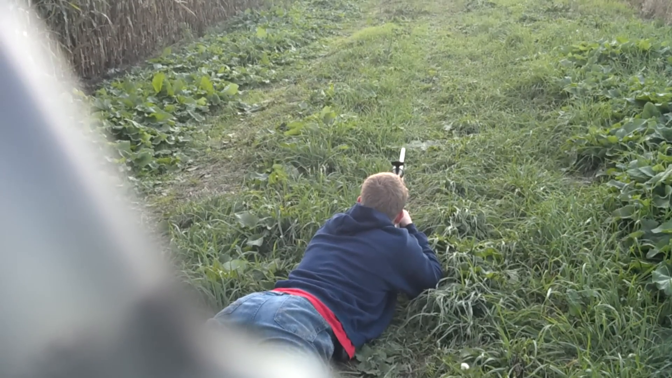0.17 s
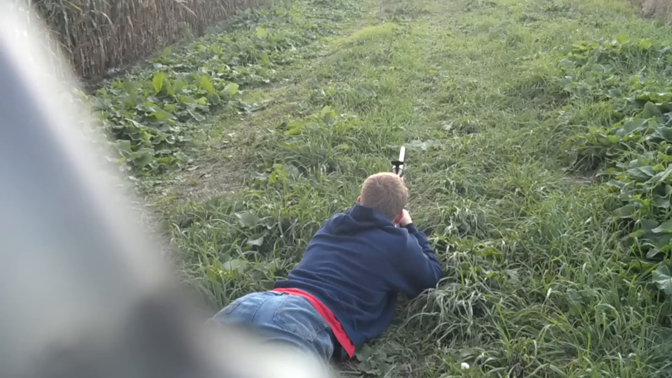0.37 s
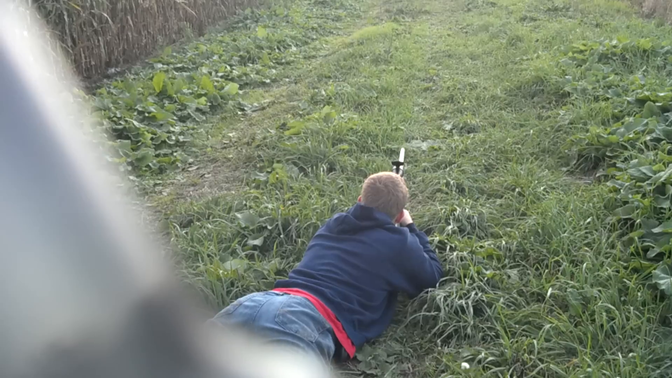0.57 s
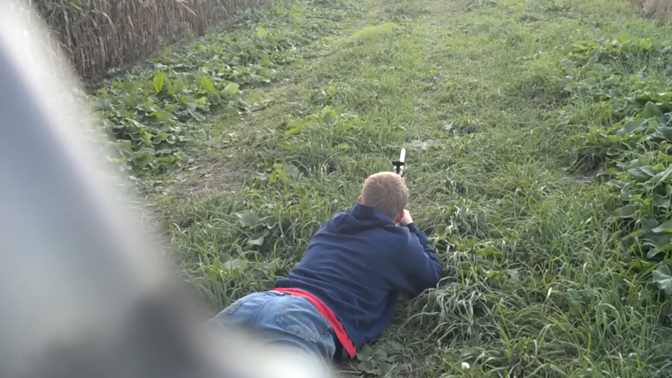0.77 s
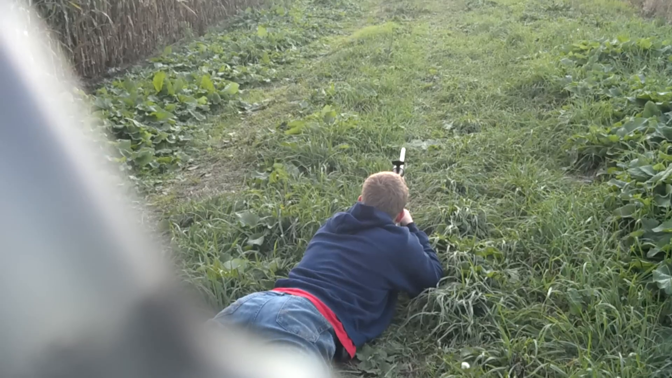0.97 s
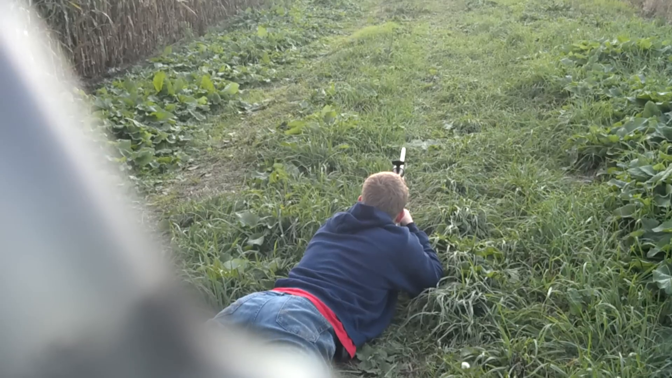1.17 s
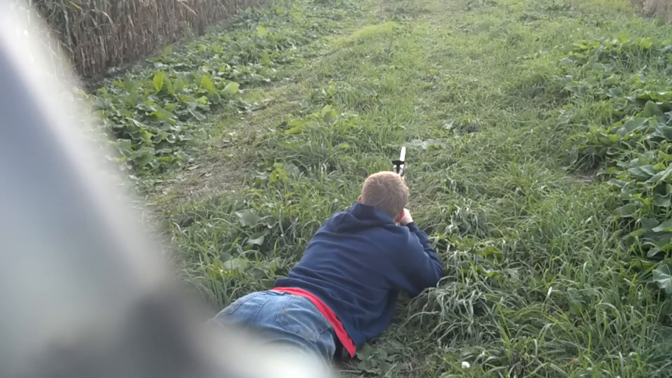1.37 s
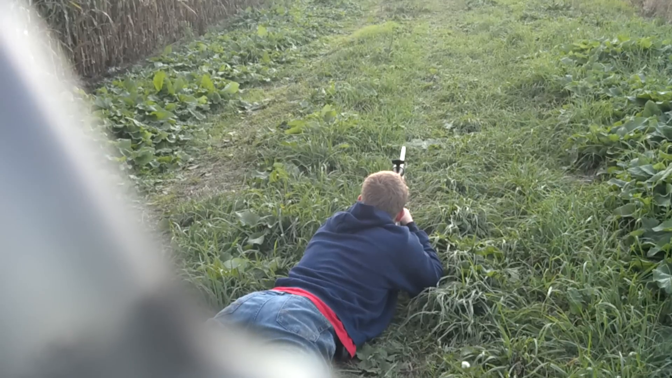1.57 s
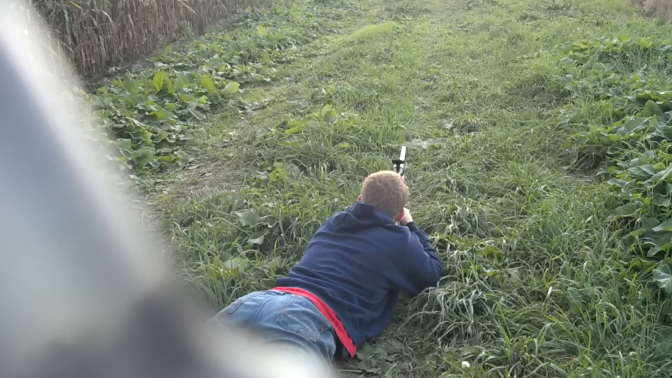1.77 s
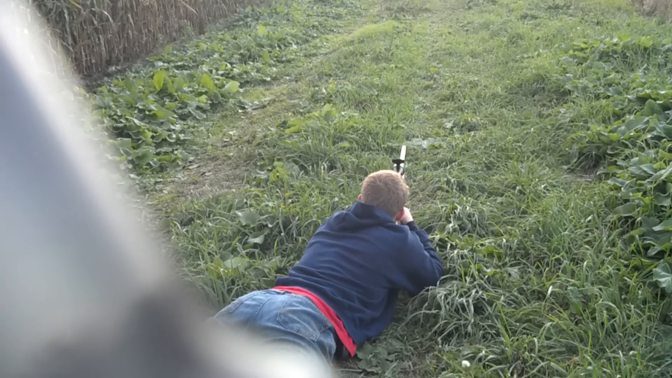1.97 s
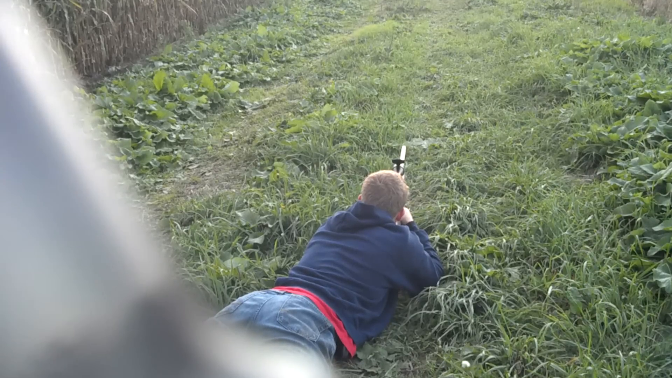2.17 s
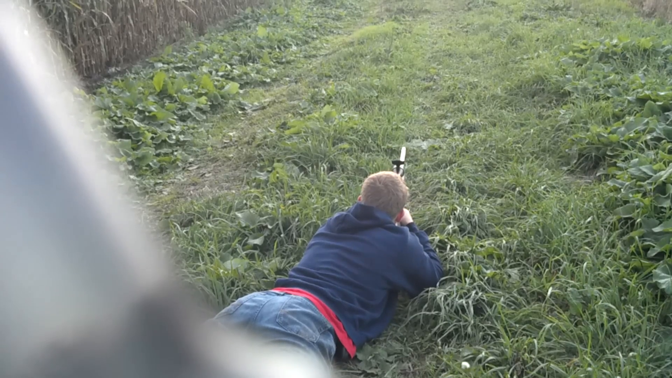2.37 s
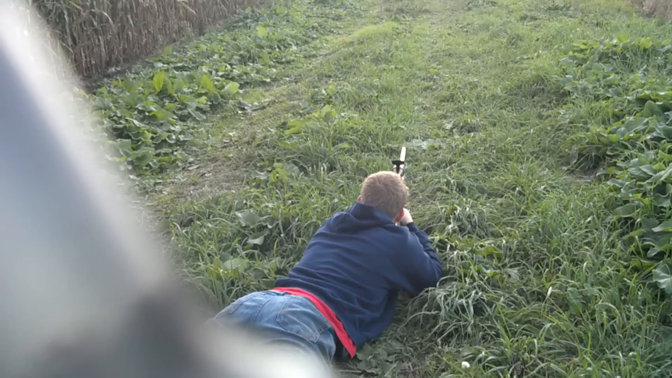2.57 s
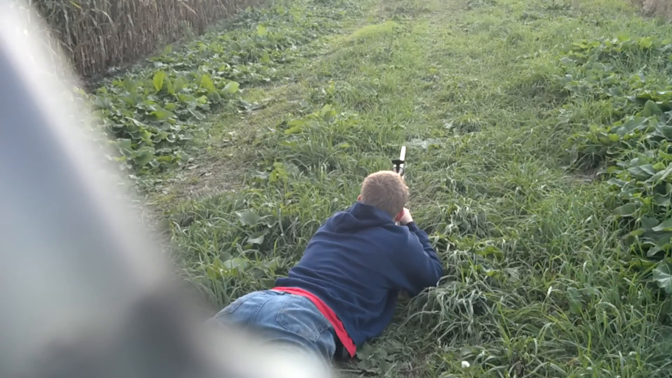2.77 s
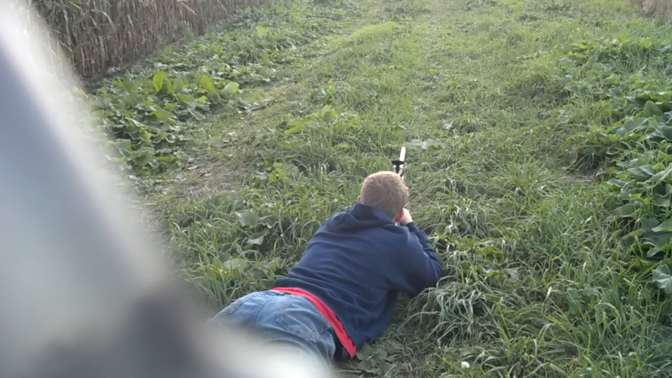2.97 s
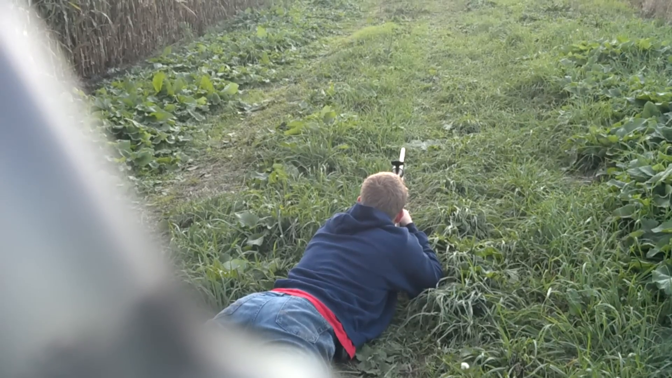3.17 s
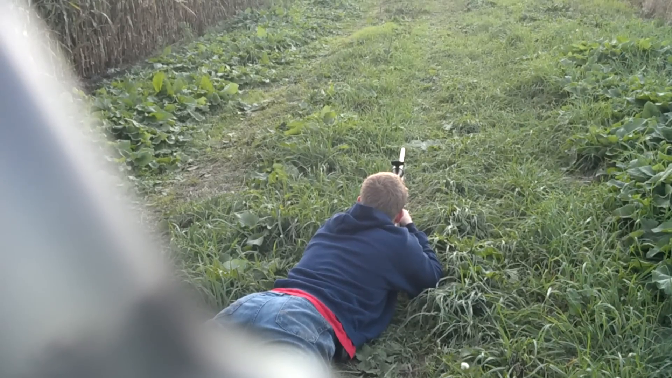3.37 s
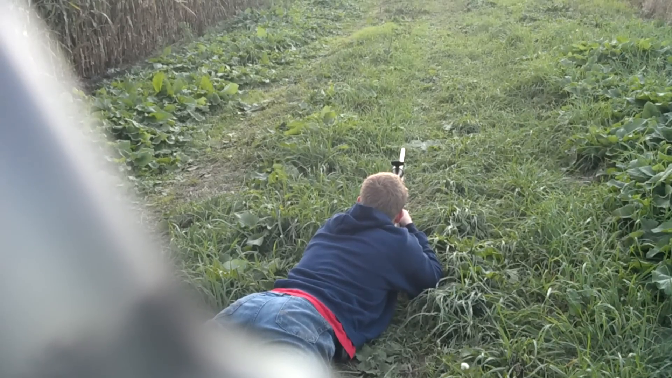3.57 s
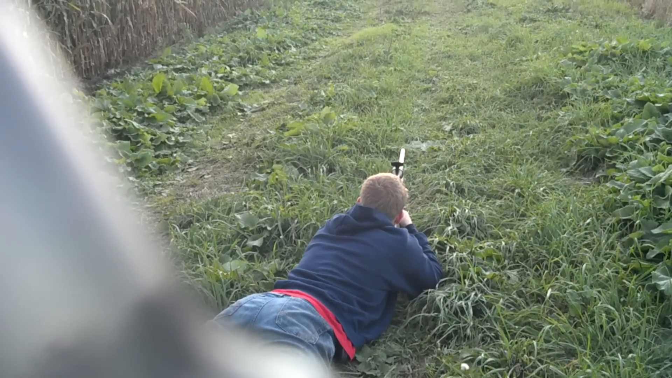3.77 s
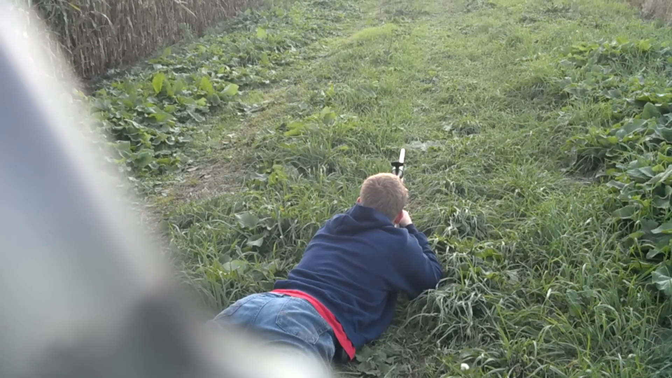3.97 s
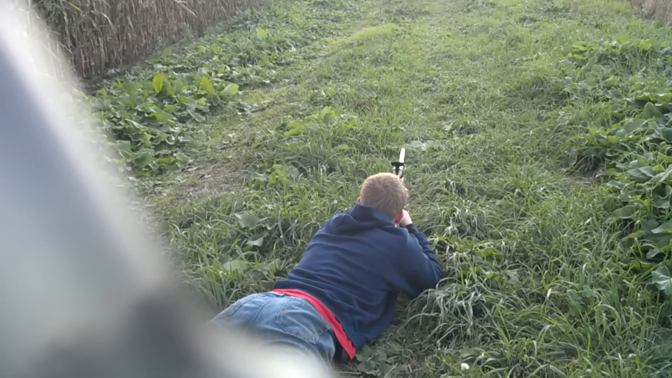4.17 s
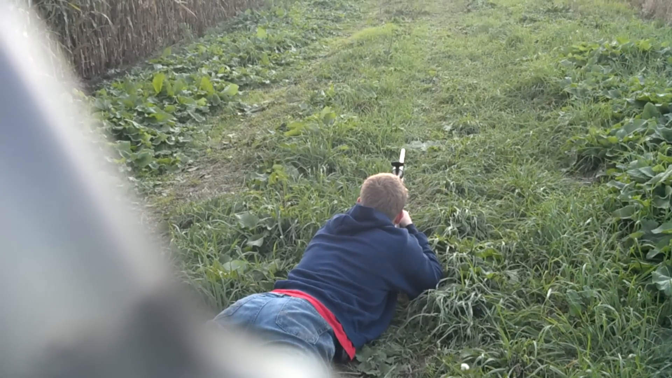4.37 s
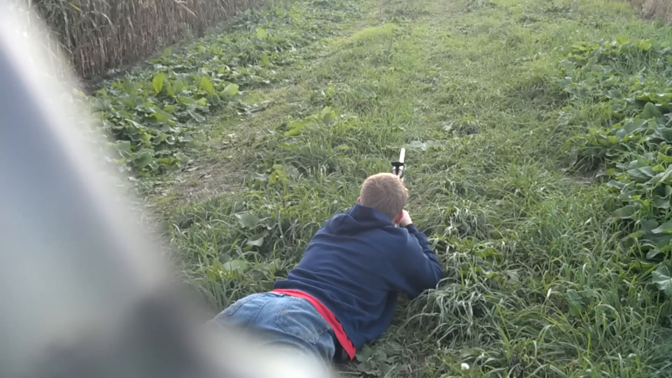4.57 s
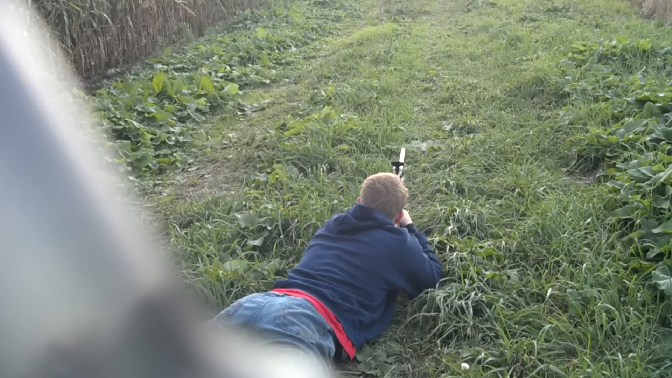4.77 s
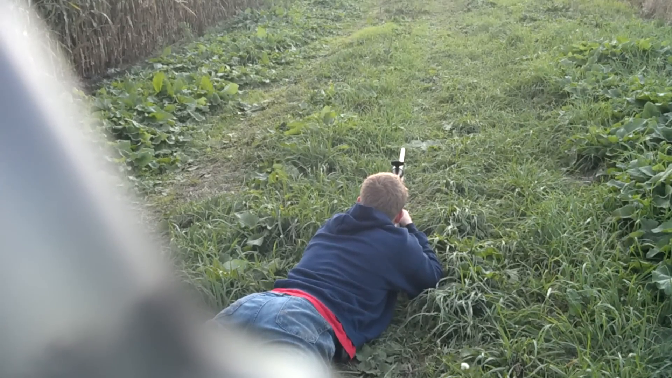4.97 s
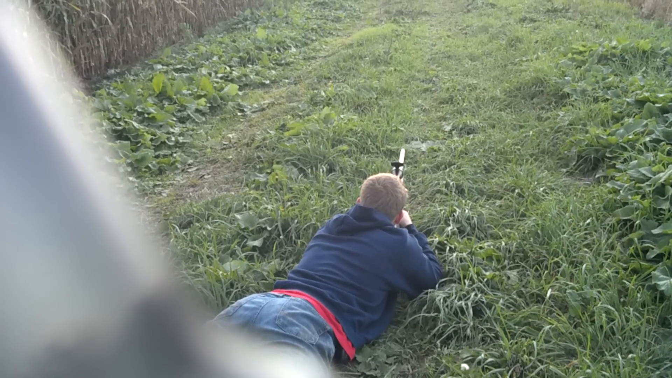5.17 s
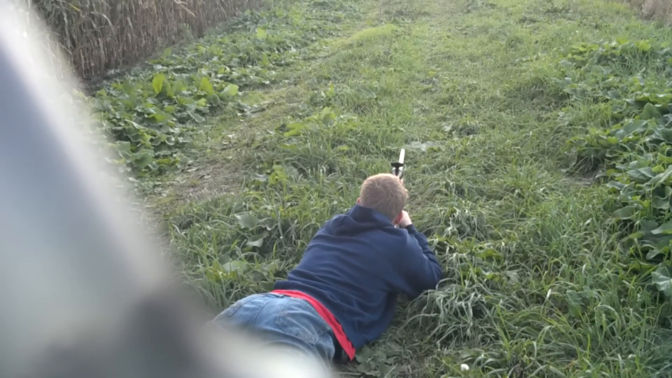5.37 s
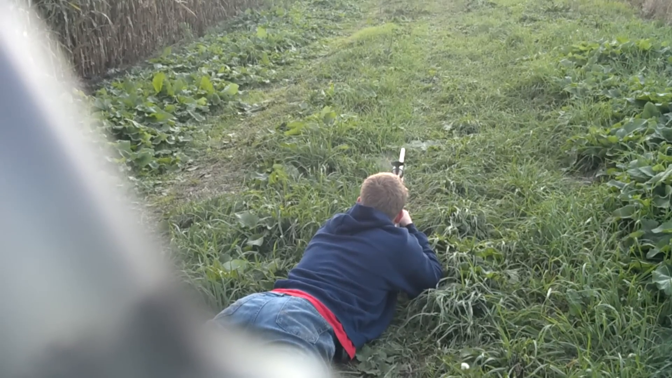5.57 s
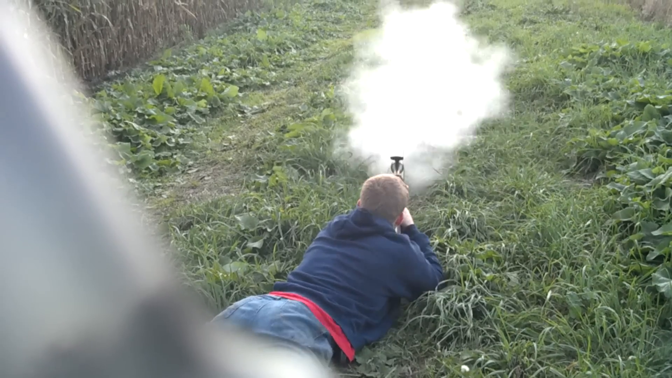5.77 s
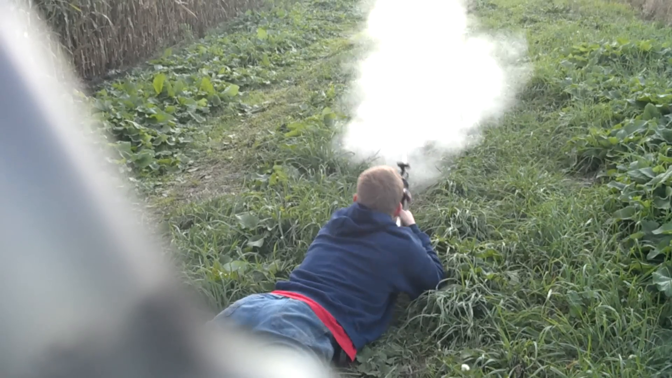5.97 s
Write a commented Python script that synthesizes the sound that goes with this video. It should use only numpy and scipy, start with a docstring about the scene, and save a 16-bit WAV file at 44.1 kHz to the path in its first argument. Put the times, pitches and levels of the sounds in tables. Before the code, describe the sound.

Crickets trill faintly with a few small ticks, then a muzzleloader's cap cracks and the rifle fires with a loud, rolling blast.

```python
"""A muzzleloader is fired in a grassy lane between crops. A brief rustle opens over a bed of far rumble
and trilling crickets; small, close ticks come and go, and near 4 s the nearest cricket slows down.
At 5.57 s the priming cap cracks. A tenth of a second later the charge goes off: low thumps under a roar
that rolls back from the stalks. Two microphone ports are widened by subtracting each, slightly delayed,
from the other side, and the peaks of the shot overload."""
import sys
import numpy as np
from scipy import signal
from scipy.fft import rfft, irfft, next_fast_len
from scipy.io import wavfile

SR = 44100
rng = np.random.default_rng(int(sys.argv[2]) if len(sys.argv) > 2 else 0)


def wav_record(signal):
    """Record a signal, one row per channel, as 16-bit PCM in the file named by sys.argv[1]."""
    frames = np.transpose(np.atleast_2d(signal))
    bounded = np.clip(frames, -1, 1)
    # unit amplitude maps onto the largest positive 16-bit level
    quanta = np.round(bounded * 32767).astype(np.int16)
    wavfile.write(sys.argv[1], SR, quanta)


N = 264688


def charge():
    """The main blast: N-shaped thumps under a roar whose lows and highs die before its middle."""
    # the muzzle wave and its first echoes (time [s], level [dB], length [ms])
    muzzle_waves = [(5.678, -15.5, 1.5), (5.681, -4.5, 4.74), (5.697, -9, 5.26), (5.7045, -8, 5.02),
                    (5.721, -14, 3.8)]
    # envelope of the roar scattered back by the crop (time [s], level [dB])
    roar_envelope = [(5.676, -36), (5.682, -12.5), (5.708, -14.5), (5.78, -20.5), (5.825, -27),
                     (5.94, -30.5), (6.0, -31.5)]
    # the roar's weight, body and sizzle (frequency [Hz], level [dB])
    low_colour = [(60, -22), (110, 4), (190, 10.5), (500, -2.5), (900, -14), (1500, -27.5)]
    mid_colour = [(400, -19.5), (900, -4), (1300, -2), (2100, 2), (3800, 0.5), (5500, -6.5), (9000, -54)]
    high_colour = [(3500, -22), (6000, 5.5), (9000, -3.5), (15500, -26), (16500, -24)]
    low_sag_db_per_s, high_sag_db_per_s, ragged_db, crack_t60_s = 41, 14, 1.7, 0.1
    t, thumps = np.arange(N) / SR, 0
    for s, db, ms in muzzle_waves:
        thumps += from_db(db) * np.interp((t - s) * 1000 / ms, [0, 1], [1, -1], left=0, right=0)
    since = np.maximum(t - roar_envelope[0][0], 0)
    clumps = rms_one(signal.lfilter([1], [1, -.985], rng.standard_normal(N)))   # echoes arrive in clumps
    level = (since > 0) * from_db(np.interp(t, *np.transpose(roar_envelope)) + ragged_db * clumps)
    shared_lows = from_db(-4) * coloured(low_colour)[0]   # alike at both ports
    own_lows = from_db(-6) * coloured(low_colour)
    lows = level * from_db(-4 - low_sag_db_per_s * since) * (shared_lows + own_lows)
    crack = 1 + from_db(5.5 - 60 * since / crack_t60_s)   # the highs flare as the blast arrives
    highs = crack * from_db(-13 - high_sag_db_per_s * since) * coloured(high_colour)
    near, far = level * (coloured(mid_colour) + highs)
    return at_ports(thumps + near, far, far_db=-10.5, own_db=-6.5) + lows


def priming_cap():
    """A short shock and its ground echo; grass and stalks scatter it back in three ever fainter tails."""
    # the scattered tails (level [dB], t60 [s])
    tails = [(-4.5, 0.017), (-24.5, 0.097), (-44.5, 0.4)]
    # their tone (frequency [Hz], level [dB])
    tail_colour = [(90, -26), (250, 14), (800, 2), (2000, 8.5), (4000, 4.5), (8000, -6), (13000, -17),
                   (16400, -11)]
    fire_s, pull_ms, push_ms, echo_ms = 5.5675, 0.22, 1.05, .8
    swing_hz, swing_t60_s = 125, .035   # the air swings on slowly after the push
    t = np.arange(N) / SR - fire_s
    along = np.clip((t * 1000 - pull_ms) / push_ms, 0, 50)
    pull = (t > 0) * (along == 0)
    push = from_db(.5) * (along > 0) * (1 - along) * np.exp(-along)   # dies away and swings under
    shock = push - pull
    shock += from_db(-5) * late(shock, count=int(echo_ms * SR / 1000))
    after = np.clip(t - (pull_ms + push_ms) / 1000, 0, 1)
    swing = from_db(-19 - 60 * after / swing_t60_s) * np.sin(2 * np.pi * swing_hz * after)
    fade = (t > .0004) * sum(from_db(db - 60 * np.clip(t, 0, 1) / t60) for db, t60 in tails)
    near, far = fade * coloured(tail_colour)
    return at_ports(from_db(6) * (shock - swing) + near, far, far_db=-12.5, own_db=-3.5)


def ticks():
    """Small close ticks: each strikes dull body modes, a hollow ring, a thin ring and a bright snap."""
    # the hits, with snap and rings relative to the level
    # (time [s], level [dB], snap [dB], hollow ring [dB], body pitch [Hz], thin ring [dB])
    hits = [(0.153, -52, -12, -22, 1300, -22), (0.173, -40.5, -14, -25, 2020, -26),
            (0.204, -56, 2, -20, 1960, -21), (1.3, -42, -24, -5.5, 1200, -16),
            (2.114, -47.5, -12, -21, 1335, -9), (2.336, -38.5, -17.5, -40, 1323, -14),
            (2.444, -53, -26, -15, 1030, -17), (2.539, -54, -8.5, -31, 1370, -8),
            (3.677, -51.5, -13, -34, 960, 2.5), (4.039, -53.5, -16, -21, 980, -7),
            (4.333, -45, -11, -34, 1240, -24), (4.378, -50, 1, -7, 1480, -28)]
    # dull body (multiple of body pitch [ratio], level [dB], t60 [s])
    body_modes = [(.7, -14, 0.0055), (1.0, -10, 0.024), (1.36, -17, 0.019), (1.62, -6.5, 0.011)]
    # hollow ring (frequency [Hz], level [dB], t60 [s])
    hollow_modes = [(757, 0, .14), (500, -2, .04)]
    # tone of the snap (frequency [Hz], level [dB])
    snap_colour = [(2000, -11.5), (5000, -9), (7500, -10), (10000, -17.5), (15500, -18), (16000, -40)]
    bounce_s, snap_t60_s = .007, .045
    s, db, snap_db, hollow_db, body_hz, thin_db = np.transpose(hits)
    starts = np.round(s * SR).astype(int)
    after, body = np.arange(4000) / SR, np.zeros(N)
    for start, hit_db, hz in zip(starts, db, body_hz):
        for multiple, mode_db, t60 in body_modes:
            fade = from_db(hit_db + mode_db + rng.normal(0, 2.3) - 60 * after / t60)
            body[start:start + len(after)] += fade * np.sin(2 * np.pi * multiple * hz * after)
    body += from_db(-7) * late(body, count=int(bounce_s * SR))   # every tick touches a second time
    clicks = np.zeros((3, N))
    clicks[:, starts] = from_db(db + np.array([hollow_db, thin_db, snap_db]))
    hollow_clicks, thin_clicks, snap_clicks = clicks
    hollow = sum(from_db(mode_db) * ring(hollow_clicks, hz, t60) for hz, mode_db, t60 in hollow_modes)
    thin = ring(thin_clicks, hz=4730, t60=0.045)
    snap_fade = signal.lfilter([1], [1, -from_db(-60 / (snap_t60_s * SR))], snap_clicks + 1e-18)
    near_snap, far_snap = snap_fade * coloured(snap_colour)
    return at_ports(body + hollow + thin + near_snap, far_snap, far_db=-15, own_db=-2)


def rustle():
    """Cloth or leaves brushing: grainy noise that grows, holds and stops."""
    # tone of the brushing (frequency [Hz], level [dB])
    brush_colour = [(60, -35), (200, 22), (600, 8), (2000, 8.5), (6000, 3.5), (10000, -1.5), (15200, -12),
                    (15600, -58)]
    full_s, end_s, grow_db_per_s, fade_db_per_s, grains_per_s = 0.093, .245, 95, 600, 130
    t = np.arange(N) / SR
    db = -60.5 - grow_db_per_s * np.maximum(full_s - t, 0) - fade_db_per_s * np.clip(t - end_s, 0, 1)
    flares = (rng.random(N) < grains_per_s / SR) * rng.exponential(1, N)
    grain = 1 + from_db(-5.5) * signal.lfilter([1], [1, -.985], flares + 1e-18)
    return from_db(db) * grain * coloured(brush_colour)


def near_cricket():
    """One singer close by, off to one side and higher than the rest; its trill slows down."""
    strokes_per_s = np.interp(np.arange(N) / SR, [3.9, 4.1], [43, 35])
    return trill(strokes_per_s, db=-68.5, top_hz=5040) * from_db([[-2], [-9]])


def trill(per_s, db, top_hz):
    """A cricket's song: a regular train of short falling whistles; now and then a stroke is missed."""
    stroke_ms, fall_hz, miss_chance = 14, 560, .05
    strokes = np.cumsum(per_s + np.zeros(N)) / SR + rng.random()
    number = strokes.astype(int)
    luck, accent = rng.random((320, 2))[number].T
    along = np.clip((strokes - number) / per_s * 1000 / stroke_ms, 0, 1)   # 0-1 through the stroke
    strength = (luck > miss_chance) * from_db(db + 3.7 * accent)
    pitch = top_hz - fall_hz * along
    return strength * np.sin(np.pi * along) ** 2 * np.sin(2 * np.pi * np.cumsum(pitch) / SR)


def cricket_chorus():
    """Singers all round, out of step, over the narrow noise of those too far to tell apart."""
    # the far singers' blur (frequency [Hz], nominal width [Hz], level [dB])
    blur_bands = [(3705, 350, -77.5), (4072, 350, -75), (4386, 530, -77.5)]
    blur, singers = 0, np.zeros((2, N))
    for hz, width_hz, db in blur_bands:
        band = resonance(rng.standard_normal((2, N)), hz, width_hz * 1.2)
        blur += from_db(db) * rms_one(resonance(band, hz, width_hz * 1.3))
    for k, detune in enumerate(np.linspace(-1.8, 1.5, 10)):
        db = -72 - 5.4 * detune ** 2   # loudest near the middle pitch
        singers[k % 2] += trill(per_s=rng.normal(45.5, 1.3), db=db, top_hz=4320 + 300 * detune)
    return at_ports(*(blur + singers), far_db=-25, own_db=2.0)


def background():
    """A steady bed of far rumble and microphone hiss; now and then a narrow band of the rumble swells."""
    # tone of the bed (frequency [Hz], level [dB])
    bed_colour = [(25, -0.5), (50, -9), (75, -7.5), (125, 3.5), (230, -6.5), (700, -17), (1500, -26),
                  (3000, -26), (8000, -30), (15200, -37.5), (15500, -72)]
    # swells of the rumble (start [s], length [s], level at the crest [dB], frequency [Hz])
    rumble_swells = [(0.096, 1.4, -67, 293), (0.35, 0.94, -65.5, 138), (2.396, 0.57, -66, 136),
                     (2.85, 0.93, -67, 291), (4.2, 1.2, -69.5, 136), (4.44, 0.98, -69, 290)]
    bed = from_db(-62.5) * coloured(bed_colour)
    for s, length, db, hz in rumble_swells:
        swell = np.sin(np.pi * np.clip((np.arange(N) / SR - s) / length, 0, 1))
        bed += from_db(db) * swell * rms_one(resonance(rng.standard_normal((2, N)), hz, width_hz=35))
    return bed


def at_ports(direct, scattered, far_db, own_db):
    """The far port hears the direct sound weaker and later, plus a scattered part of its own."""
    return np.array([direct, from_db(far_db) * late(direct, count=5) + from_db(own_db) * scattered])


def coloured(spectrum):
    """One unrelated noise per port with the given spectrum; rms 1."""
    size = next_fast_len(N)
    hz = np.maximum(np.arange(size // 2 + 1) * SR / size, 1)
    hz_points, db = np.transpose(spectrum)
    gain = from_db(np.interp(np.log(hz), np.log(hz_points), db))
    return rms_one(irfft(rfft(rng.standard_normal((2, size))) * gain, size)[:, :N])


def resonance(x, hz, width_hz):
    """Two-pole band-pass with unity gain at its peak."""
    r = np.exp(-np.pi * width_hz / SR)
    gain = (1 - r * r) / 2
    return signal.lfilter([gain, 0, -gain], [1, -2 * r * np.cos(2 * np.pi * hz / SR), r * r], x)


def ring(clicks, hz, t60):
    """A unit click sets a sine of height 1 ringing."""
    r, w = from_db(-60 / (t60 * SR)), 2 * np.pi * hz / SR
    return signal.lfilter([0, np.sin(w)], [1, -2 * r * np.cos(w), r * r], clicks + 1e-18)


def late(x, count):
    """Delay by whole samples."""
    return np.concatenate([np.zeros(count), x[:N - count]])


def from_db(db):
    """Decibels to gain."""
    return 10 ** (np.asarray(db) / 20)


def rms_one(x):
    """Scale to unit rms."""
    return x / np.sqrt(np.mean(x ** 2) + 1e-20)


def scene():
    """The shot and the ambience of the lane, as pressure at the two ports."""
    low_cut = signal.butter(3, 75, "high", fs=SR, output="sos")   # the shot's deepest bass is cut away
    shot = signal.sosfilt(low_cut, priming_cap() + charge())
    return background() + cricket_chorus() + near_cricket() + rustle() + ticks() + shot


def record(dry):
    """Stereo widening: each side loses a delayed copy of the other; then hard overload and a top cut."""
    # the converter's DC shift, one row a side (offset [full scale])
    dc_offset = [
        [-.00097],
        [.0012],
    ]
    capsule_cut_hz, bass_hz, top_cut_hz = 60, 336, 16570
    ports = signal.sosfilt(signal.butter(2, capsule_cut_hz, "high", fs=SR, output="sos"), dry)
    bass = signal.sosfilt(signal.butter(1, bass_hz, fs=SR, output="sos"), ports)
    from_left, from_right = [[1.05], [.93]] * (ports - 0.063 * bass)   # the bass is widened less
    wide = ports - [late(from_right, count=16), late(from_left, count=16)]
    clipped = np.clip(wide * from_db([[0], [1.2]]) + dc_offset, -.95, .95)
    return signal.sosfilt(signal.cheby2(14, 90, top_cut_hz, fs=SR, output="sos"), clipped)


dry = scene()
out = record(dry)
wav_record(out)
```